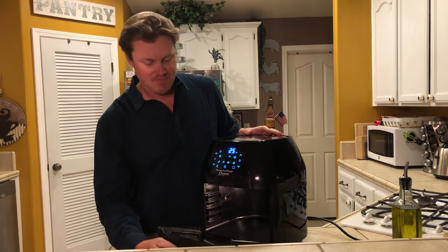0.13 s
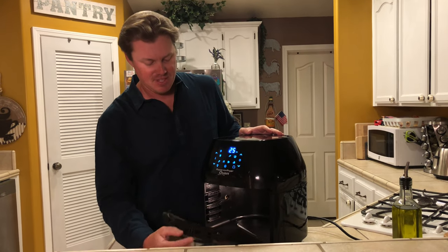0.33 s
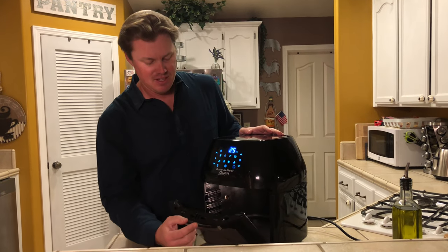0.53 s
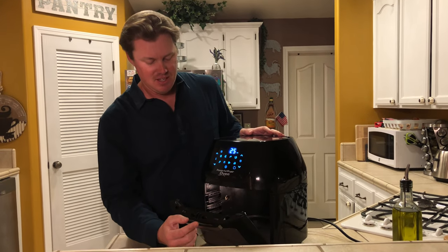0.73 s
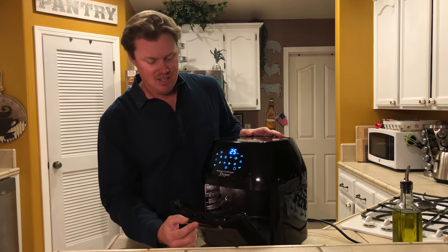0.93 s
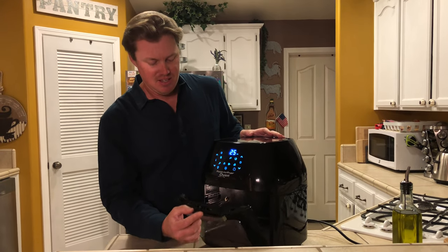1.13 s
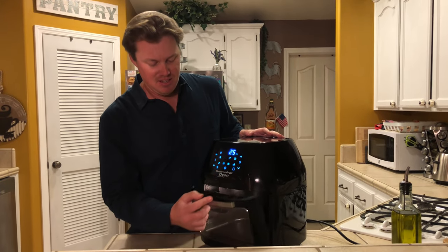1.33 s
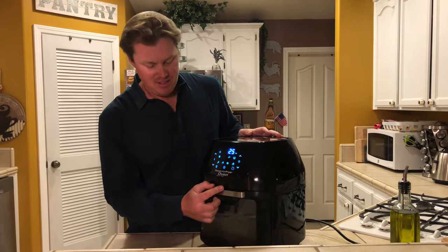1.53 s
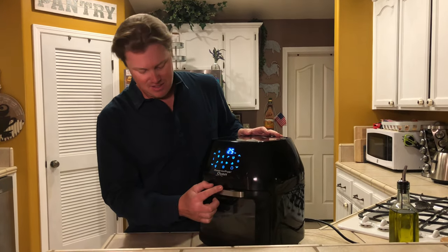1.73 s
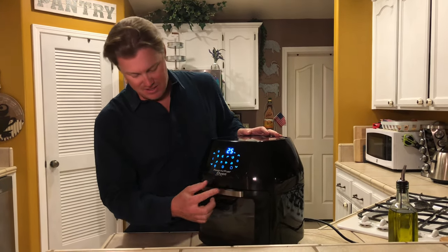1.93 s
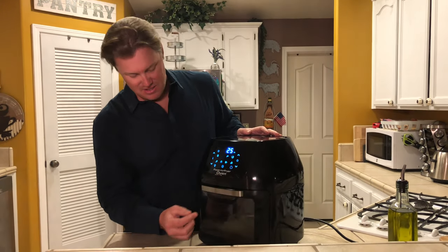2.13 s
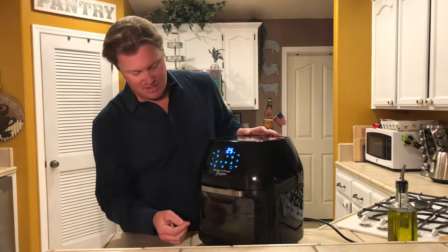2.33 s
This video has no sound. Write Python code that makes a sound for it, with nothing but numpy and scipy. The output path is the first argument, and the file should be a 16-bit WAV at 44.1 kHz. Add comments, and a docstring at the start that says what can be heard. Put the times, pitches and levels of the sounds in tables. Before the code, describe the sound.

A countertop oven door clacks shut with a sharp latch snap and brief ring in a quiet kitchen

```python
"""The loose door of a countertop oven is lifted and pushed shut in a quiet kitchen.
It knocks in its frame; the hinge ticks and double-clicks (noise bursts), its spring twangs (decaying sines).
The housing bumps on the counter (force pulses into foot modes) and the door's edge rubs (swelling noise).
The latch snaps (noise bursts); the door slams (pulses into panel colours and modes), rattles and rings on.
A late tick follows; faint room noise (shaped noise) runs throughout."""
import sys
import numpy as np
from scipy import signal
from scipy.fft import rfft, irfft
from scipy.io import wavfile

SR = 44100
rng = np.random.default_rng(int(sys.argv[2]) if len(sys.argv) > 2 else 0)


def put_to_file(sound):
    """Save the sound as 16-bit audio at rate SR, in the file named by the first command-line argument."""
    columns = np.atleast_2d(sound).T  # one column per channel
    safe = np.clip(columns, -1, 1)
    whole_steps = np.round(safe * 32767)
    wavfile.write(sys.argv[1], SR, whole_steps.astype(np.int16))


N = 104605
TIME_S = np.arange(N) / SR

# Levels are relative, ahead of colours and layer gains.
# door blows on the housing, first touch to last rattle: start_s, level_db, contact_s, mode_coupling_db
BLOWS = [(1.4295, -27, .0007, -10.5), (1.4333, -24.5, 0.00098, -11.5), (1.4609, -21, 0.00077, -10.5),
         (1.4765, -3.5, 0.00055, -22), (1.4809, 4, 0.0013, -1.5), (1.4865, -15, 0.00074, -9.5),
         (1.568, -17, 0.00048, -32), (1.584, -15.5, .0012, -4.5), (1.752, -28.5, .0012, -10.5)]
# spectrum of the struck panels: freq_hz, level_db
PANEL_COLOUR = [(30, -33.5), (70, -10), (130, -3), (220, -11), (330, 3.5), (450, -4), (600, 7.5),
                (860, -6.5), (1400, -3), (2500, -10.5), (5000, -11), (15000, -26.5)]
# housing modes, one list per column, same order: freq_hz; level_db; t60_s
HOUSING_MODE_HZ = [127, 130.5, 255, 308, 349, 395, 436, 505, 566, 580, 677, 721, 763, 911, 1219, 1302, 1728,
                   1817, 1987, 2278]
HOUSING_MODE_DB = [-18.5, -45, -42, -22, -29, -32, -32, -25, -24, -26, -27, -28, -31, -41, -35, -37, -32,
                   -34, -33, -31]
HOUSING_MODE_T60_S = [.3, 2.3, .5, .36, .36, 0.19, .35, .36, .44, 0.45, 0.21, 0.12, .42, 0.38, 0.58, .48,
                      0.44, 0.35, .42, .35]
# lingering ring of racks and panels: freq_hz, level_db
LINGER_COLOUR = [(60, -12), (150, -1.5), (300, -1.5), (580, -6.5), (900, -20.5), (2000, -19.5),
                 (5000, -28.5), (15000, -56)]
# latch snaps: start_s, level_db, length_s, low_cut_hz
SNAPS = [(1.4595, -11.5, 0.00084, 3020), (1.4615, 2, 0.0024, 1278), (1.4627, 3, 0.0048, 1174),
         (1.468, -1, 0.012, 1201), (1.4735, -2.5, 0.0032, 1000), (1.4747, 0.5, .002, 1200)]
# spectrum of the latch: freq_hz, level_db
LATCH_COLOUR = [(200, -7), (1000, 7), (1700, 8.5), (3000, -1.5), (4400, 0.5), (5000, -2.5), (5900, 3.5),
                (7600, -3), (8400, 0.5), (9400, -7), (10500, -2), (12500, -12.5), (15800, -12)]
# dry ticks of the plastic: start_s, level_db, length_s, low_cut_hz
TICKS = [(.2394, -34, 0.0017, 9000), (.2445, -33.5, 0.00099, 9000), (.3669, -32.5, 0.00051, 7000),
         (2.339, -44, 0.0028, 5000)]
# spectrum of the ticks: freq_hz, level_db
TICK_COLOUR = [(1000, 5), (5000, -8), (9000, -1.5), (11000, 1), (13500, 4), (15500, -8.5)]
# hinge clicking over its catch: start_s, level_db, length_s, low_cut_hz
HINGE_CLICKS = [(.3743, -24, 0.0017, 1100), (.376, -23, 0.00104, 1090)]
# spectrum of the hinge clicks: freq_hz, level_db
HINGE_COLOUR = [(800, -15), (1400, 0.5), (2900, -8.5), (4050, 7.5), (4450, 1), (5300, 5.5), (6200, -7),
                (7500, 8.5), (8600, -2.5), (9400, 2.5), (10200, -6), (11300, 1), (15500, -6.5)]
# door spring modes: freq_hz, level_db, t60_s
SPRING_MODES = [(1735, -2.5, 1.7), (1780, -0.5, 1.3), (1850, -4, 1.2), (2186, -6, 1.5), (3500, -7, 1.4),
                (3600, -6, 1.5), (3700, -8, 1.4)]
# knocks of the loose door in its frame: start_s, level_db, length_s, low_cut_hz
KNOCKS = [(.017, -34, 0.023, 1390), (.035, -36, 0.018, 980), (.458, -33.5, 0.0038, 1010),
          (.4775, -42, 0.0033, 1130), (1.113, -46, 0.0038, 400), (1.428, -24.5, 0.0044, 1510)]
# spectrum of the knocks: freq_hz, level_db
KNOCK_COLOUR = [(100, -14), (620, 4), (900, 2), (1450, 6), (2100, 1), (2900, -7.5), (3500, -1.5),
                (4500, -16), (6500, -23), (15000, -44.5)]
# spectrum of the rub: freq_hz, level_db
RUB_COLOUR = [(80, -11), (200, 6), (650, -0.5), (1500, -7), (4000, -21.5), (15000, -38.5)]
# soft bumps of the housing on the counter: start_s, level_db, contact_s
BUMPS = [(0.502, -23, .002), (0.531, -50, .002), (.549, -25.5, .002), (1.0155, -21, .002),
         (1.0218, -15.5, .002), (1.046, -30, .003), (1.065, -22, .003), (1.116, -26, .002),
         (1.158, -18.5, .002), (1.189, -32.5, .002), (1.217, -25, .002), (1.266, -36.5, .002),
         (1.331, -39, .002), (1.413, -23, .003), (1.4323, -6.5, .0015), (1.4382, 2.5, .003),
         (1.444, -3, .003)]
# modes of the oven rocking on its feet: freq_hz, level_db, t60_s
FOOT_MODES = [(158.8, -2, 0.37), (192, 2.5, 0.076), (286, -12, 0.12), (650, -14.5, .05)]
# kitchen reverberation: freq_hz, t60_s
ROOM_T60 = [(80, 0.86), (250, 0.67), (600, 0.52), (1500, 0.52), (4000, 0.51), (7000, .37), (11000, .32),
            (16000, .24)]
# room noise density: freq_hz, level_db_per_hz
NOISE_COLOUR = [(20, -13.5), (40, -14), (65, 0), (110, -4.5), (160, 0), (250, -7), (400, -8), (650, -12),
                (1000, -18.5), (2000, -23.5), (5000, -27), (15500, -31)]

THUD_DB, SLAM_ROOM_DB, SLAM_LOW_CUT_HZ = 9.5, -4, 87
CLATTER_DB, CLATTER_T60_S = 7.5, 0.056
LINGER_DB, LINGER_T60_S = -14, 1.6
LATCH_ROOM_DB = -3.5
TICK_ROOM_DB, HINGE_ROOM_DB = -8, -8
SCATTER_DB, SCATTER_T60_S = -7.5, 0.098
WALL_ECHO_S, WALL_ECHO_DB = 0.0125, -18
SPRING_START_S, SPRING_DB = 0.53, -76.5
RUB_PEAK_S, RUB_SWELL_S, RUB_DB = 1.43, 0.034, -56
KNOCK_ROOM_DB = -5
BUMP_ROOM_DB, BUMP_LOW_CUT_HZ = -9, 140
ROOM_DELAY_S, ROOM_BUILD_S = 0.0046, 0.0013
NOISE_RMS_DB = -66.5
CUTOFF_HZ = 15900


def slam():
    """The door lands: a push of air, a short panel clatter, the housing's modes and a faint long ring."""
    force, mode_drive = np.zeros((2, N))
    for start_s, level_db, contact_s, coupling_db in BLOWS:
        pulse = push(contact_s)
        add(force, start_s, amp(level_db) * pulse)
        add(mode_drive, start_s, amp(level_db + coupling_db) * pulse)
    thud = through(force, colour(PANEL_COLOUR))
    clatter = through(thud, dense_ring(CLATTER_T60_S))
    housing_modes = zip(HOUSING_MODE_HZ, HOUSING_MODE_DB, HOUSING_MODE_T60_S)
    housing = through(mode_drive, ring(housing_modes))
    linger = through(through(mode_drive, colour(LINGER_COLOUR)), dense_ring(LINGER_T60_S))
    direct = amp(THUD_DB) * kitchen(thud, SLAM_ROOM_DB)
    mix = direct + amp(CLATTER_DB) * clatter + housing + amp(LINGER_DB) * linger
    return low_cut(mix, SLAM_LOW_CUT_HZ, order=4)


def latch():
    """The catch scrapes over its lip and snaps in; each snap takes its own paths through the room."""
    return sum(kitchen(clicks([snap], LATCH_COLOUR), LATCH_ROOM_DB) for snap in SNAPS)


def hinge():
    """Dry ticks, a double click scattered by the counter and nearest wall, and a faint spring twang."""
    out = kitchen(clicks(TICKS, TICK_COLOUR), TICK_ROOM_DB)
    catch = clicks(HINGE_CLICKS, HINGE_COLOUR)
    out += kitchen(catch, HINGE_ROOM_DB)
    out += amp(SCATTER_DB) * through(catch, dense_ring(SCATTER_T60_S))
    add(out, WALL_ECHO_S, amp(WALL_ECHO_DB) * catch)
    add(out, SPRING_START_S, amp(SPRING_DB) * ring(SPRING_MODES))
    return out


def frame():
    """The loose door knocks in its frame; its edge rubs there in a noise swell around closing."""
    swell = np.exp(-abs(TIME_S - RUB_PEAK_S) / RUB_SWELL_S)
    friction = amp(RUB_DB) * swell * rng.standard_normal(N)
    rub = through(friction, colour(RUB_COLOUR))
    return kitchen(clicks(KNOCKS, KNOCK_COLOUR) + rub, KNOCK_ROOM_DB)


def bumps():
    """The oven rocks on its feet as the door is lifted: force pulses excite the foot modes."""
    force = np.zeros(N)
    for start_s, level_db, contact_s in BUMPS:
        add(force, start_s, amp(level_db) * push(contact_s))
    rocking = through(force, unit(ring(FOOT_MODES)))
    return kitchen(low_cut(rocking, BUMP_LOW_CUT_HZ, order=3), BUMP_ROOM_DB)


def room_noise():
    """Steady low murmur of the kitchen air and a thin hiss: noise shaped in frequency."""
    gain = amp(read(NOISE_COLOUR, np.fft.rfftfreq(N, 1 / SR)))
    noise = irfft(rfft(rng.standard_normal(N)) * gain, N)
    return amp(NOISE_RMS_DB) * noise / noise.std()


def kitchen(x, wet_db):
    """Adds a dense tail of reflections whose treble dies first."""
    taps = rng.choice([-1., 1.], SR) * (rng.random(SR) < .2)  # sparse reflections, 1 s
    hz, frame_s, bands = signal.stft(taps, SR, nperseg=256)
    decay = amp(-60 * frame_s / read(ROOM_T60, hz)[:, None])
    tail = signal.istft(bands * decay, SR, nperseg=256)[1][:SR]
    onset = np.clip((TIME_S[:SR] - ROOM_DELAY_S) / ROOM_BUILD_S, 0, 1)
    return x + amp(wet_db) * through(x, unit(tail * onset))


def clicks(rows, points):
    """Short contacts heard through one colour."""
    out = np.zeros(N)
    for start_s, level_db, length_s, low_cut_hz in rows:
        add(out, start_s, amp(level_db) * scrape(length_s, low_cut_hz))
    return through(out, colour(points))


def scrape(length_s, low_cut_hz, size=2048):
    """A brief burst of tiny contacts with an even spectrum, thinned below low_cut_hz."""
    fade = np.exp(-(TIME_S[:size] / length_s) ** 2)
    burst = rng.standard_normal(size) * fade
    for _ in range(3):  # alternately flatten the spectrum and restore the fade
        phase = np.angle(rfft(burst))
        burst = irfft(np.exp(1j * phase), size) * np.sqrt(fade)
    return unit(low_cut(burst, low_cut_hz))


def push(contact_s, size=512):
    """A force pulse of unit area: the longer the contact, the duller."""
    u = TIME_S[:size] / (contact_s / 10)  # peaks at a tenth of the contact
    pulse = u * np.exp(-u)
    return pulse / pulse.sum()


def ring(modes):
    """Decaying sines of a struck object."""
    return sum(amp(level_db - 60 * TIME_S / t60_s) * np.sin(2 * np.pi * hz * TIME_S)
               for hz, level_db, t60_s in modes)


def dense_ring(t60_s):
    """Countless close modes dying together, as decaying noise of unit energy."""
    return unit(rng.standard_normal(N) * 1000 ** (-TIME_S / t60_s))


def colour(points, size=4096):
    """Minimum-phase impulse response of unit energy with the given spectrum."""
    hz = abs(np.fft.fftfreq(size, 1 / SR))
    log_gain = np.log(amp(read(points, hz)))
    spectrum = np.exp(np.conj(signal.hilbert(log_gain)))
    return unit(np.fft.ifft(spectrum).real)


def low_cut(x, hz, order=2):
    """Attenuates what lies below hz."""
    sos = signal.butter(order, min(hz, SR / 2 - 1), "high", fs=SR, output="sos")
    return signal.sosfilt(sos, x)


def through(x, response):
    """Passes x through an impulse response."""
    return signal.fftconvolve(x, response)[:N]


def read(points, hz):
    """Reads a table along a log-frequency axis."""
    f, value = np.transpose(points)
    return np.interp(np.log(hz + 1), np.log(f), value)


def add(mix, start_s, sound):
    """Mixes a sound in at start_s, in place."""
    part = mix[round(start_s * SR):][:len(sound)]
    part += sound[:len(part)]


def unit(x):
    """Scales to an energy of one."""
    return x / np.sqrt(np.sum(x ** 2) + 1e-20)


def amp(db):
    """Decibels to gain."""
    return 10 ** (np.asarray(db) / 20)


def scene():
    """All sources at one microphone."""
    return (slam() + latch() + hinge() + frame() + bumps() + room_noise())[None]


def record(dry):
    """The recorder's band limit: a linear-phase low-pass."""
    low_pass = signal.firwin(255, CUTOFF_HZ, window=("kaiser", 9), fs=SR)
    return signal.oaconvolve(dry, low_pass[None], "same")


dry = scene()
out = record(dry)
put_to_file(out)
```